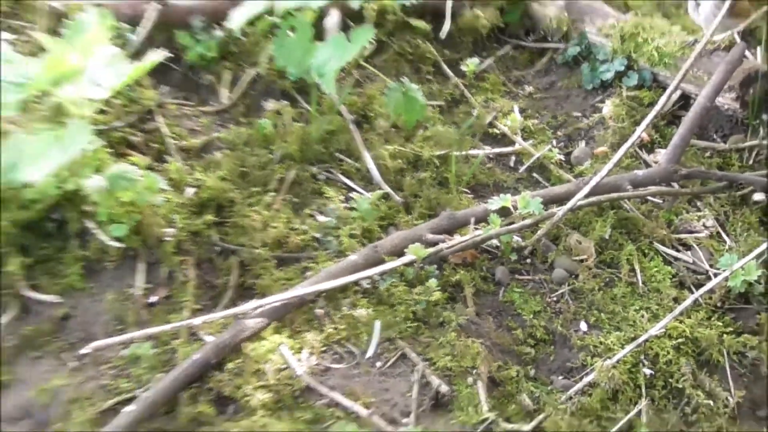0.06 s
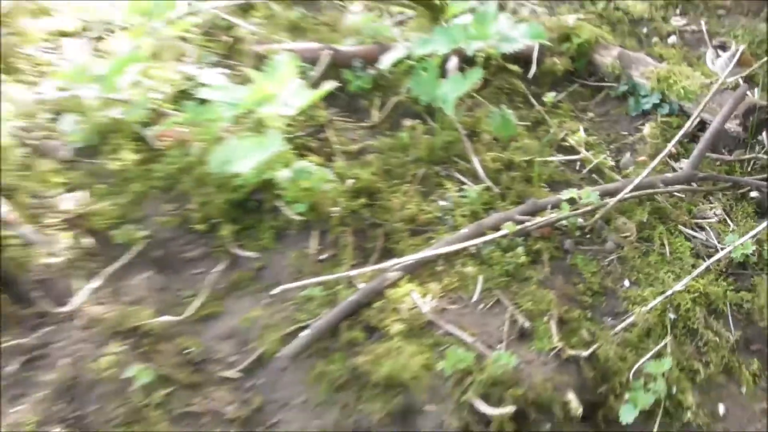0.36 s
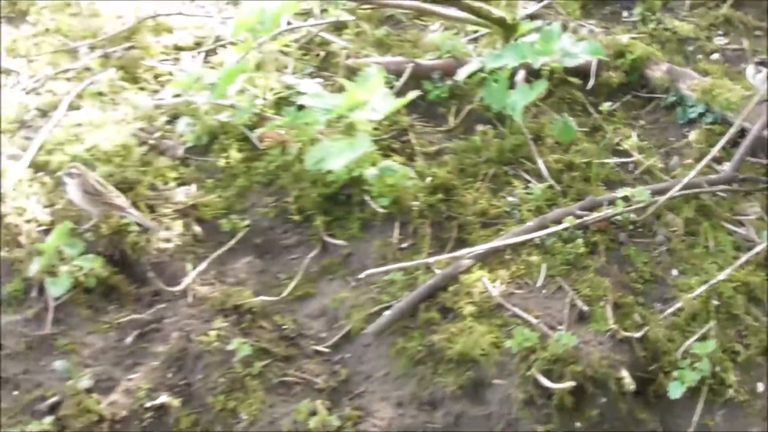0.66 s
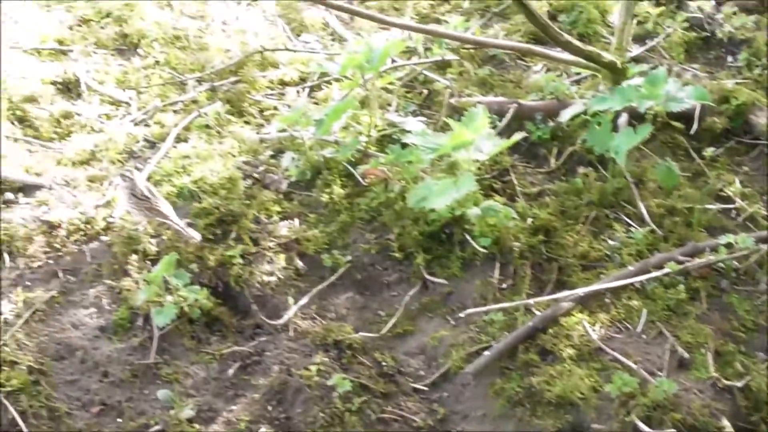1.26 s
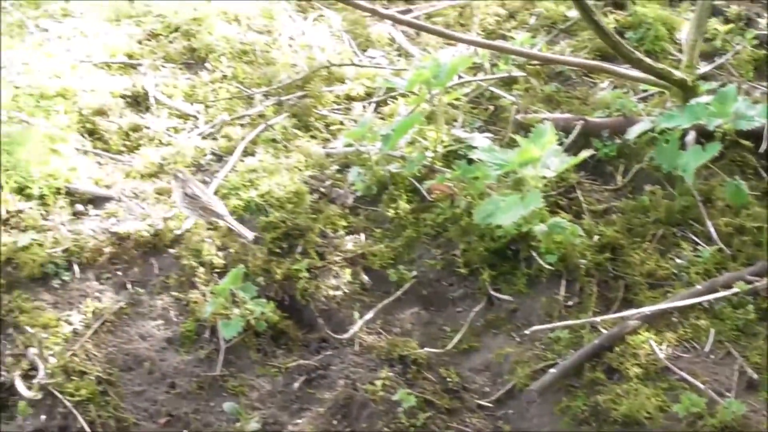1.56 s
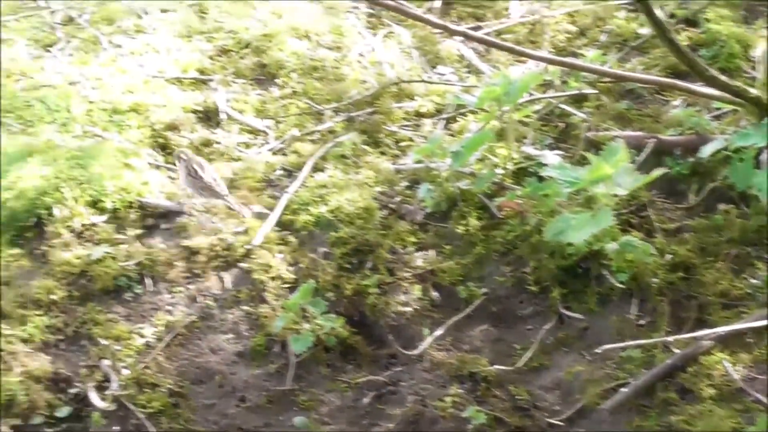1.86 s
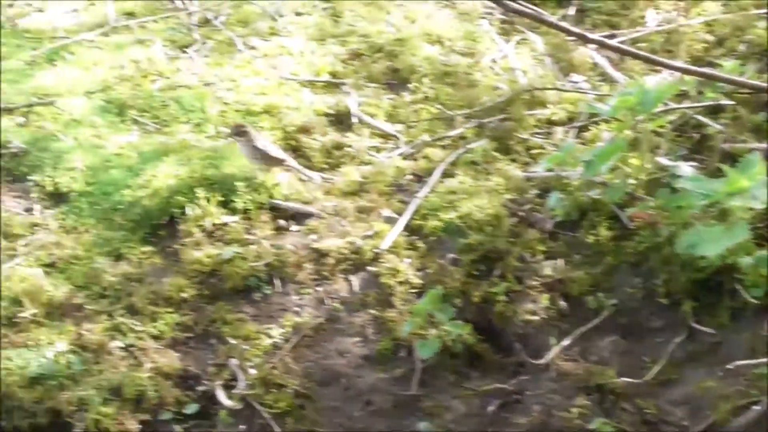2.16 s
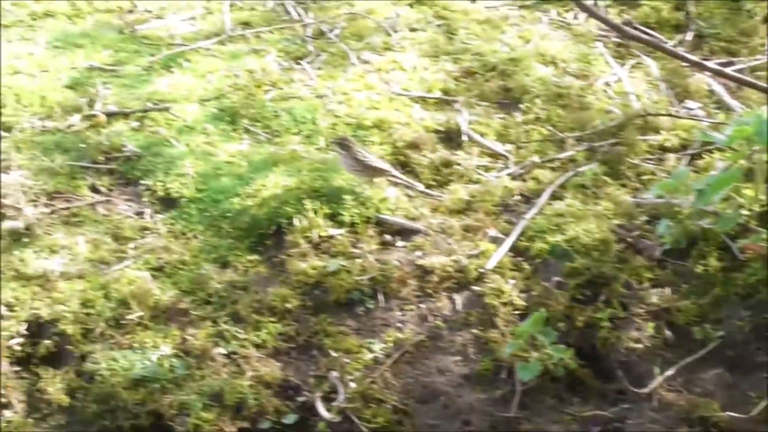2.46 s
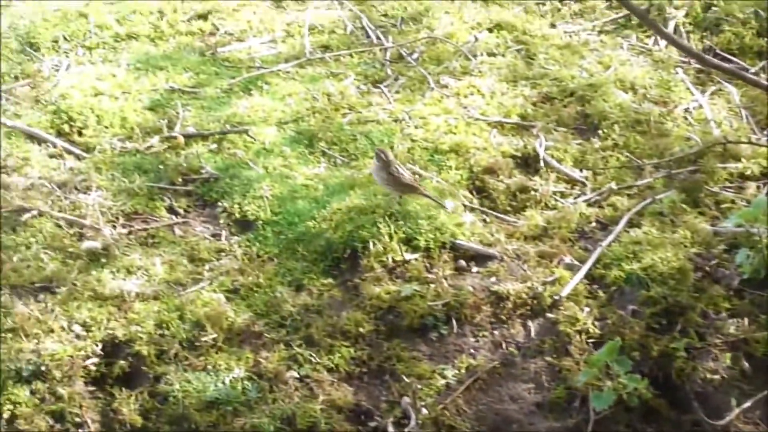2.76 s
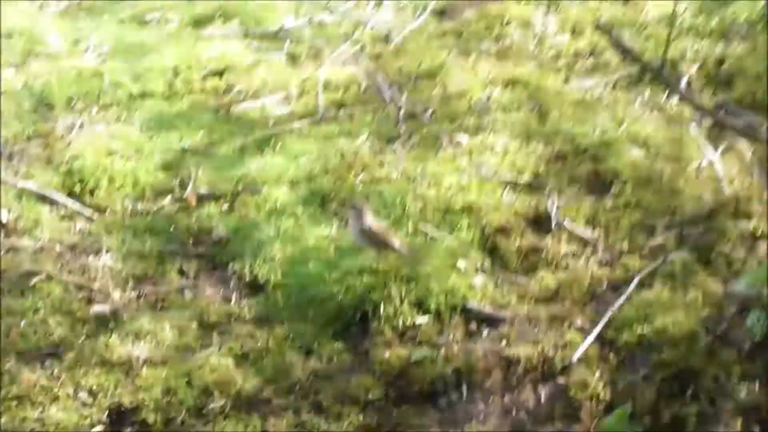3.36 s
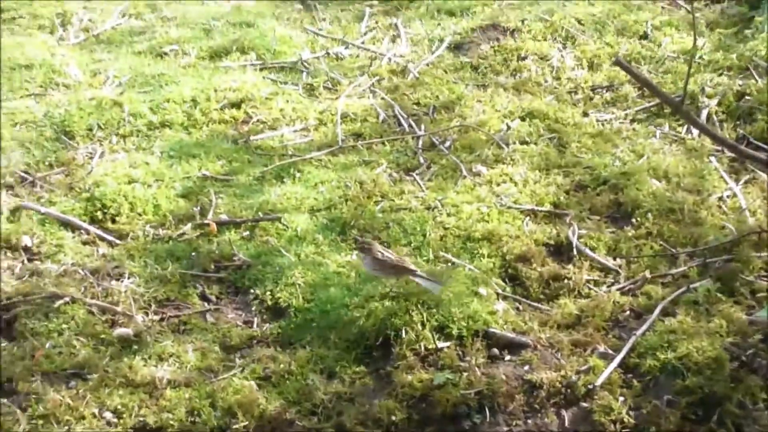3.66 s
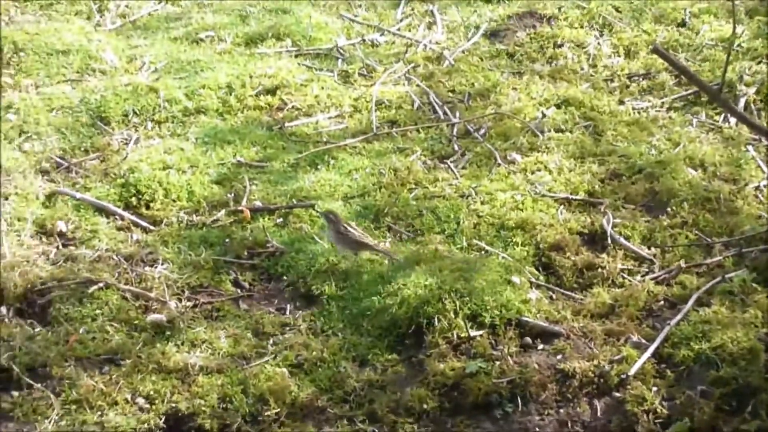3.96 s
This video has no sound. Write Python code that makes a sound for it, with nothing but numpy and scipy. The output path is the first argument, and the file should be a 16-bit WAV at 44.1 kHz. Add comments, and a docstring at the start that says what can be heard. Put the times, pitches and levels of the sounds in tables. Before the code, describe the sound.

Birdsong with a soft woodland echo opens with short whistles and buzzy notes, moves to repeated upslurred calls and ends on a thin high whistle. Brief handling clicks sound close to the microphone, with low rumble and hiss behind.

```python
"""Small birds sing among trees, whose echoes give each note a soft tail, over a distant rumble, a faint
hiss and far twittering. First, falling whistles alternate with four wheezy buzzes, tones modulated by a
fast trill. Around the last buzz begin four upslurs, each ending in a flick. A run of arched notes joins
the last of them, and a thin high whistle from both sides of a syrinx closes the song. Now and then a
hand-held camera clicks, as brief contacts excite the modes of its body."""
import sys
import numpy as np
from scipy import signal
from scipy.io import wavfile
from scipy.ndimage import uniform_filter1d

SR = 44100
rng = np.random.default_rng(int(sys.argv[2]) if len(sys.argv) > 2 else 0)


def inscribe(sig):
    """Save sig as 16-bit PCM at rate SR to the path in sys.argv[1].

    A 1-D sig is mono; a 2-D sig holds one channel per row.
    Samples are clipped to [-1, 1] before scaling.
    """
    pcm = np.round(np.clip(np.atleast_2d(sig).T, -1, 1) * 32767)
    wavfile.write(sys.argv[1], SR, pcm.astype(np.int16))


N = 176400

# Spectra of the rumble and the hiss: f/Hz, relative spectral level/dB
RUMBLE_SPECTRUM = [(12, -34), (20, -12), (65, 1.5), (112, -1), (135, -3.5), (251, -5), (412, -10),
                   (754, -9.5), (1150, -19.5), (1600, -43), (2080, -85), (3520, -120)]
HISS_SPECTRUM = [(900, 8), (1600, 2.5), (2400, 3.5), (3400, 2.5), (4400, 4.5), (5300, -12), (7300, -1.5),
                 (10000, -3.5), (15500, -7.5)]
# Likeness of the noise in the two channels: f/Hz, coherence
NOISE_COHERENCE = [(30, .6), (70, 0.61), (150, 0.99), (330, 0.67), (700, 0.85), (1400, .45), (3500, 0.79),
                   (5500, 1), (8000, 0.8), (15000, 0.1)]
# Balance of the noise: f/Hz, pan/dB (pan is always left level minus right)
NOISE_PAN = [(30, -10), (80, -2.5), (170, -1.7), (350, 0), (15000, 0.5)]
# Course of the twitter: t/s, level of the strongest notes before scattering/dB
TWITTER_LEVELS = [(0, -60.5), (.9, -66), (1.8, -65), (2.4, -75), (4, -64)]
# Gliding notes, far and near: t/s, length/s, first f/Hz, middle f/Hz, last f/Hz, level/dB, swell/dB
FAR_GLIDES = [(0, 0.16, 4490, 4730, 3800, -59.5, 3), (.128, .2, 5595, 5780, 5680, -56.5, -5.5),
              (.335, 0.13, 4580, 4300, 4400, -58, -12), (.5, 0.22, 5060, 4750, 4950, -64.5, -6),
              (.69, 0.065, 4250, 4270, 4300, -60, -4), (.79, 0.027, 5793, 5900, 5100, -55, 0),
              (1.08, 0.13, 4830, 4580, 4800, -62.5, 0), (1.67, 0.071, 4840, 4900, 5100, -59.5, -10),
              (1.79, 0.068, 4500, 4650, 4400, -57, 0), (2.098, 0.0814, 5660, 5450, 5500, -65.5, -18),
              (3.075, 0.029, 5870, 5600, 4900, -58.5, 0), (3.765, 0.038, 4290, 3900, 3900, -59, 0),
              (3.806, 0.028, 4300, 5000, 3300, -56.5, 19), (3.95, 0.14, 6350, 5900, 5300, -54, 4)]
WHISTLE_GLIDES = [(.166, 0.065, 3330, 2810, 2700, -50, -4), (0.228, 0.11, 2747, 2730, 2470, -53.5, -16),
                  (.28, 0.054, 3780, 3830, 3680, -54.5, 15), (0.323, 0.0553, 3680, 3530, 3390, -40.5, 3),
                  (0.734, 0.092, 2732, 2680, 2660, -47, -9), (.78, .05, 3480, 3640, 4000, -60, 7),
                  (0.823, 0.079, 3535, 3480, 3340, -39.5, 1.5), (1.246, 0.11, 2800, 2660, 2630, -51.5, 1),
                  (1.268, .115, 5640, 5770, 5470, -47, 4), (1.32, 0.044, 3450, 3620, 3570, -57, 7),
                  (1.353, .1, 3530, 3430, 3250, -41, -6.5)]
# Scratchy chips: t/s, length/s, f/Hz, level/dB
FAR_CHIPS = [(0.473, 0.022, 7100, -53), (1.187, 0.037, 7230, -55.5)]
# Two-voiced whistle: t/s, lower f/Hz, its level/dB, upper f/Hz, its level/dB
THIN_VOICES = [(3.582, 7900, -60, 9150, -72), (3.606, 7730, -47.5, 9000, -62),
               (3.665, 7530, -51, 8800, -54.5), (3.8, 7530, -52.5, 8750, -57.5),
               (3.87, 7600, -55.5, 8770, -61), (3.94, 7440, -67, 8500, -64)]
# Arched notes: t/s, length/s, top f/Hz, level/dB
ARCH_NOTES = [(3.162, 0.078, 2270, -48), (3.255, 0.064, 2333, -48), (3.334, 0.075, 2370, -49),
              (3.42, 0.077, 2320, -50)]
# Upslurs: t/s of the flick's top, lead-in/s, level/dB, pan/dB
UPSLUR_CALLS = [(1.916, .085, -39.5, -2.5), (2.333, 0.076, -38.5, -3.5), (2.793, .125, -38, -3),
                (3.28, 0.14, -38, -4.6)]
# Course of an upslur: t/s from the top, f/Hz, relative level/dB
UPSLUR_CONTOUR = [(-.135, 2870, -25), (-.09, 2990, -21.5), (-.05, 3188, -8), (-.018, 3520, -0.5),
                  (-.007, 3960, 2.5), (0, 4465, -16.5), (.005, 4050, -2.5), (.01, 3160, -5),
                  (.018, 4000, 1)]
# Buzzes: t/s, length/s, reference f/Hz, level/dB, gain of the direct sound/dB, pan/dB
BUZZ_CALLS = [(0.514, .24, 3308, -41, 0, 7), (.992, 0.23, 3434, -39, 0, 7),
              (1.497, .235, 3410, -40.5, -2, 7.5), (2.101, .24, 3372, -41.5, -7, 10)]
# Course of a buzz: share of its length, f/reference f, relative level/dB
BUZZ_CONTOUR = [(0, .58, -15.5), (.15, .68, -8.5), (0.299, 0.92, -4.5), (0.449, 0.95, -2.5),
                (.59, 1.01, -3.5), (0.721, 0.97, -1.5), (0.851, .82, -5.5), (1, 0.84, -8.5)]
# Handling contacts: t/s, level/dB in four rising bands (knock, clack, snap, tick), pan/dB
CAMERA_CONTACTS = [(.1085, -34, -32.5, -29, -36, -1), (.1262, -31.5, -20.5, -16.5, -13, 1.5),
                   (.567, -35, -51, -55, -62, -4.2), (.613, -48, -48, -49, -56, -2),
                   (1.526, -47, -60, -47, -37, -8), (1.9554, -38, -19.5, -15.5, -8, -3.2),
                   (2.472, -24, -22, -28, -33, -2.4), (2.512, -41, -56, -45.5, -52, 1),
                   (3.182, -30.5, -34, -41, -52, 1), (3.367, -34.5, -45, -35.5, -43, 1),
                   (3.414, -48.5, -41, -45, -55, 0.84)]
# Modes of the camera body: f/Hz, relative level/dB, T60/s
CAMERA_MODES = [(380, -10.5, 0.041), (792, 1, 0.031), (1070, -9.5, 0.022), (1290, -4.5, 0.014),
                (2195, -6.5, 0.015), (2840, -7, 0.0085), (3520, 2, 0.0074), (4270, -7.5, 0.014),
                (6060, -5.5, 0.0095), (7100, 1.5, 0.0099), (8400, -3.5, 0.0057), (9630, -2, 0.0065),
                (11650, -4.5, 0.004), (13500, -8, 0.004)]

EDGE_S = 0.0072  # rise and fall of every bird note


def amp(db):
    """Amplitude ratio of a level: 20 dB to each factor of ten."""
    return 10 ** (np.asarray(db) / 20)


def unit(x):
    """Normalisation to an rms of 1."""
    return x / np.sqrt(np.mean(x ** 2) + 1e-20)


def at_frequency(points, hz):
    """Interpolation of a table on a logarithmic frequency axis."""
    f, value = np.transpose(points)
    return np.interp(np.log(hz + 1), np.log(f + 1), value)


def add(mix, start_s, sound, pan_db=0):
    """Superposition: a sound joins the mix, placed by a level difference between the channels."""
    part = mix[:, max(round(start_s * SR), 0):][:, :sound.shape[-1]]
    part += amp([[pan_db / 2], [-pan_db / 2]]) * sound[..., :part.shape[1]]


def wander(t, fastest_hz):
    """Sinusoids of random phase, spread over a decade, sum to a fluctuation of rms about 1."""
    f = np.geomspace(fastest_hz / 10, fastest_hz, 20)[:, None]
    return np.sin(2 * np.pi * (f * t + rng.random(f.shape))).sum(0) / np.sqrt(10)


def voice(hz, db, harmonics_db=(0,), waver=0.0074, flutter_db=1.5):
    """A bird's tone as a harmonic series, with slight random modulation of frequency and amplitude."""
    t = np.arange(len(hz)) / SR
    phase = 2 * np.pi * np.cumsum(hz * (1 + waver * wander(t, 201.7))) / SR
    ends = np.sin(np.pi / 2 * np.clip(np.minimum(t, t[-1] - t) / EDGE_S, 0, 1)) ** 2
    tone = sum(amp(h) * np.sin(k * phase) for k, h in enumerate(harmonics_db, 1))
    return np.sqrt(2) * ends * amp(db + flutter_db * wander(t, 89.1)) * tone


def gliding_notes(rows, pan_db, waver):
    """Frequency glides: each near-pure tone follows a parabola through three pitches."""
    out = np.zeros((2, N))
    for start, length, first, middle, last, db, swell_db in rows:
        u = np.arange(0, 1, 1 / (length * SR))
        hz = np.polyval(np.polyfit([0, .5, 1], [first, middle, last], 2), u)
        add(out, start, voice(hz, db + swell_db * (u - .5), harmonics_db=(0, -30), waver=waver), pan_db)
    return out


def wood(x, wet_db, early_db, dry_db=0, t60_s=1.15, early_s=0.009):
    """Reverberation by convolution: early echoes from ground and trunks, and an exponential tail."""
    echoes_per_s, build_up_s, coherence = 2000, 0.024, 0.97
    t = np.arange(SR) / SR
    a, b, c, d = rng.standard_normal((4, SR)) * (rng.random((4, SR)) < echoes_per_s / SR)
    apart = np.sqrt(1 - coherence ** 2)
    tail = np.array([a, coherence * a + apart * b]) * amp(-60 * t / t60_s)
    tail *= np.minimum(t / build_up_s, 1)
    early = np.array([c, coherence * c + apart * d]) * np.exp(-t / early_s)
    echoes = (amp(wet_db) * unit(tail) + amp(early_db) * unit(early)) / np.sqrt(SR)
    return amp(dry_db) * x + signal.fftconvolve(x, echoes, axes=1)[:, :N]


def background(spectrum, level_db, patchy_db):
    """Partially coherent outdoor noise, its spectral level drifting in patches about a steady mean."""
    frames, hz = N // 512 + 5, np.fft.rfftfreq(2048, 1 / SR)
    a, b, c, d, patches = rng.standard_normal((frames, len(hz), 5)).T
    patches = unit(uniform_filter1d(uniform_filter1d(patches, size=20, axis=0), size=10, axis=1))
    coherence = at_frequency(NOISE_COHERENCE, hz)[:, None]
    left = a + 1j * b
    right = coherence * left + np.sqrt(1 - coherence ** 2) * (c + 1j * d)
    lean = amp(at_frequency(NOISE_PAN, hz) / 2)[:, None]
    spectra = np.array([left * lean, right / lean])
    spectra *= amp(at_frequency(spectrum, hz)[:, None] + patchy_db * patches)
    return amp(level_db) * unit(signal.istft(spectra, nperseg=2048, noverlap=1536)[1][:, :N])


def twitter(notes_per_s=45, range_hz=(4000, 8580), mean_length_s=0.0346, widest_glide=0.128):
    """Random short notes of distant birds, whose reverberant field outweighs the direct sound."""
    out = np.zeros((2, N))
    for when, pitch, length, slope, weakness in rng.random((round(notes_per_s * N / SR), 5)):
        start = when * N / SR
        u = np.arange(-1, 1, 2 / (mean_length_s * (.5 + length) * SR))
        hz = np.interp(pitch, [0, 1], range_hz) * (1 + widest_glide * (slope - .5) * u)
        db = np.interp(start, *np.transpose(TWITTER_LEVELS)) - 8 * weakness
        add(out, start, voice(hz, db, waver=0.014))
    return wood(out, wet_db=1, early_db=0, dry_db=-10, t60_s=0.52, early_s=0.03)


def far_birds():
    """Scattering by the trees blurs high notes and scratchy chips."""
    out = gliding_notes(FAR_GLIDES, pan_db=0, waver=0.0048)
    for start, length, hz, db in FAR_CHIPS:
        add(out, start, voice(np.full(round(length * SR), hz), db, waver=0.0444))
    return wood(out, wet_db=-2.5, early_db=-2.5, dry_db=-1.5, t60_s=1.0, early_s=0.015)


def camera_clicks(contact_s=0.00046, rattle_gain=0.82, mode_scatter=0.017):
    """Impact excitation: a brief rattling contact rings the damped modes of the camera body."""
    band_edges_hz = (1600, 5000, 10500)
    out = np.zeros((2, N))
    t = np.arange(SR // 20) / SR
    for start, *bands_db, pan_db in CAMERA_CONTACTS:
        for hz, db, t60 in CAMERA_MODES:
            band_db = bands_db[np.searchsorted(band_edges_hz, hz)]
            split = min((hz / 9100) ** 4, 3.6)  # the highest modes reach left and right differently
            rattle = rng.standard_normal(len(t)) + split * rng.standard_normal((2, len(t)))
            contact = (t == 0) + rattle_gain * rattle * t / contact_s * np.exp(-t / contact_s)
            mode_hz = hz * (1 + mode_scatter * rng.standard_normal())
            ring = np.minimum(t * hz, 1) * amp(-60 * t / t60) * np.cos(2 * np.pi * mode_hz * t)
            response = signal.fftconvolve(contact, ring[None], axes=1)[:, :len(t)]
            add(out, start, amp(band_db + db) * unit(response) * np.std(ring), pan_db)
    return wood(out, wet_db=-26, early_db=-17.5, t60_s=0.75, early_s=0.0068)


def thin_whistle():
    """Biphonation: each side of the syrinx holds its own high note, sagging and fading."""
    out = np.zeros((2, N))
    when, low_hz, low_db, high_hz, high_db = np.transpose(THIN_VOICES)
    t = np.arange(when[0], when[-1], 1 / SR)
    for hz, db in ((low_hz, low_db), (high_hz, high_db)):
        tone = voice(np.interp(t, when, hz), np.interp(t, when, db), waver=.0025)
        add(out, when[0], tone, pan_db=6.5)
    return wood(out, wet_db=-14, early_db=-7, t60_s=.6)


def arches():
    """A farther bird repeats a parabolic arch of pitch in which the second harmonic dominates."""
    out = np.zeros((2, N))
    for start, length, top_hz, db in ARCH_NOTES:
        u = np.arange(0, 1, 1 / (length * SR))
        hz = top_hz * (1 - 0.094 * (2 * (u - 0.4)) ** 2)  # highest 40% of the way through
        add(out, start, voice(hz, db, harmonics_db=(-13, -0.5, -21), waver=0.0017), pan_db=4.5)
    return wood(out, wet_db=-6.5, early_db=-10, t60_s=1.0)


def whistles():
    """Nearly sinusoidal whistles, mostly gliding downward, a low one and then a higher one."""
    return wood(gliding_notes(WHISTLE_GLIDES, pan_db=-2.5, waver=0.0045), wet_db=-11.5, early_db=-13)


def upslurs(octave_db=-29):
    """A rising frequency sweep swells and ends in a flick; its faint octave does not swell."""
    out = np.zeros((2, N))
    when, contour_hz, contour_db = np.transpose(UPSLUR_CONTOUR)
    for top, lead, db, pan_db in UPSLUR_CALLS:
        t = np.arange(-lead, when[-1] + EDGE_S / 2, 1 / SR)
        hz = np.interp(t, when, contour_hz)
        fundamental = voice(hz, db + np.interp(t, when, contour_db))
        octave = voice(2 * hz, db + octave_db)
        add(out, top - lead, fundamental + octave, pan_db)
    return wood(out, wet_db=-10, early_db=-5.5)


def buzzes(trill_hz=71.8, trill_wander=0.13, trill_depth=.075):
    """Frequency modulation: a fast trill roughens an arch of pitch; later calls have less direct sound."""
    direct, into_wood = np.zeros((2, 2, N))
    share, ratio, contour_db = np.transpose(BUZZ_CONTOUR)
    for start, length, reference_hz, db, direct_db, pan_db in BUZZ_CALLS:
        t = np.arange(0, length, 1 / SR)
        rate_hz = trill_hz * (1 + trill_wander * wander(t, 39.6))
        trill = np.sin(2 * np.pi * np.cumsum(rate_hz) / SR)
        hz = reference_hz * np.interp(t / length, share, ratio) * (1 + trill_depth * trill)
        level_db = db + np.interp(t / length, share, contour_db)
        call = voice(hz, level_db, harmonics_db=(0, -30.5), waver=0.023, flutter_db=2.0)
        add(direct, start, amp(direct_db) * call, pan_db)
        add(into_wood, start, call)
    echoes = wood(into_wood, wet_db=-6, early_db=-5, t60_s=1.28, early_s=.012) - into_wood
    return direct + echoes


def scene():
    """Linear superposition of birds, camera clicks, distant rumble and faint hiss."""
    birds = buzzes() + upslurs() + whistles() + arches() + thin_whistle() + far_birds() + twitter()
    clicks = camera_clicks()
    rumble = background(RUMBLE_SPECTRUM, level_db=-43, patchy_db=1.06)
    hiss = background(HISS_SPECTRUM, level_db=-58, patchy_db=.8)
    return rumble + hiss + clicks + birds


def record(dry):
    """Band limiting by a linear-phase low-pass filter at 16.1 kHz."""
    low_pass = signal.firwin(255, 16100, window=("kaiser", 9), fs=SR)
    return signal.oaconvolve(dry, low_pass[None], "same")


dry = scene()
out = record(dry)
inscribe(out)
```